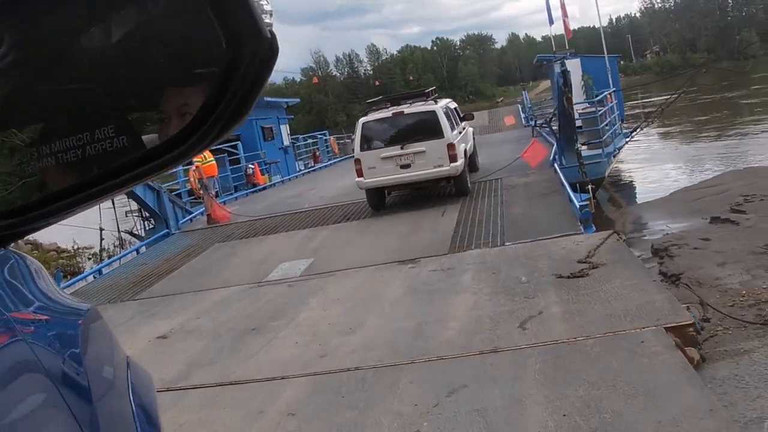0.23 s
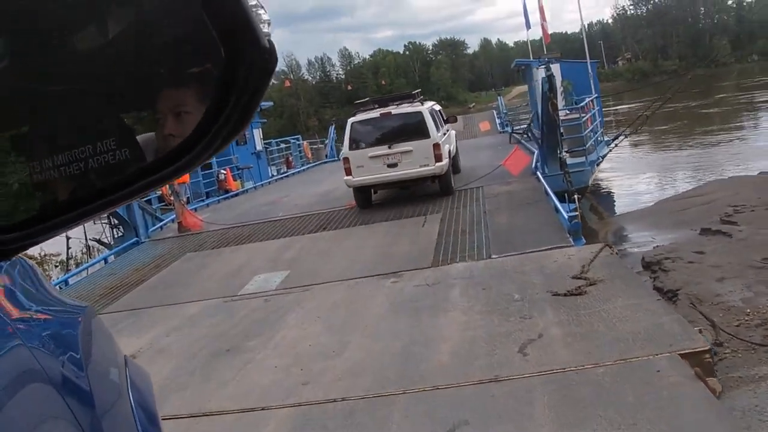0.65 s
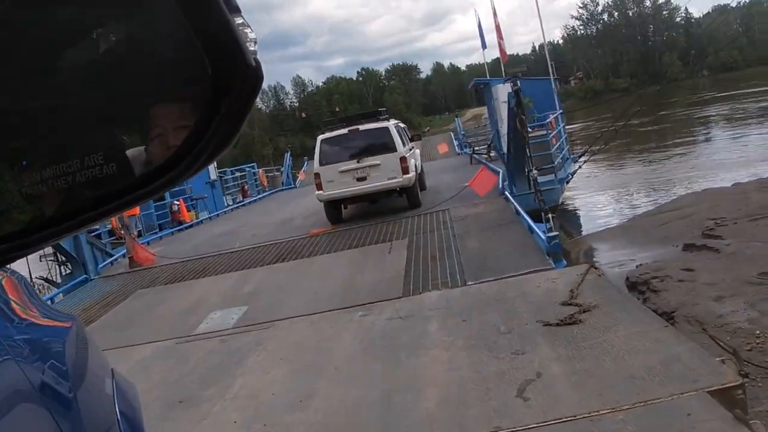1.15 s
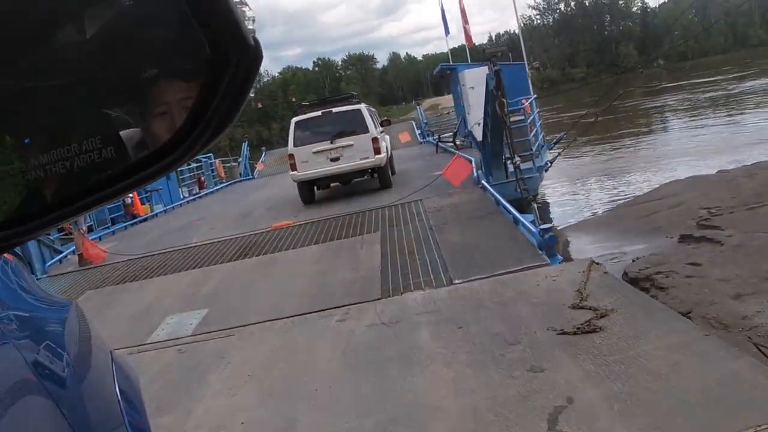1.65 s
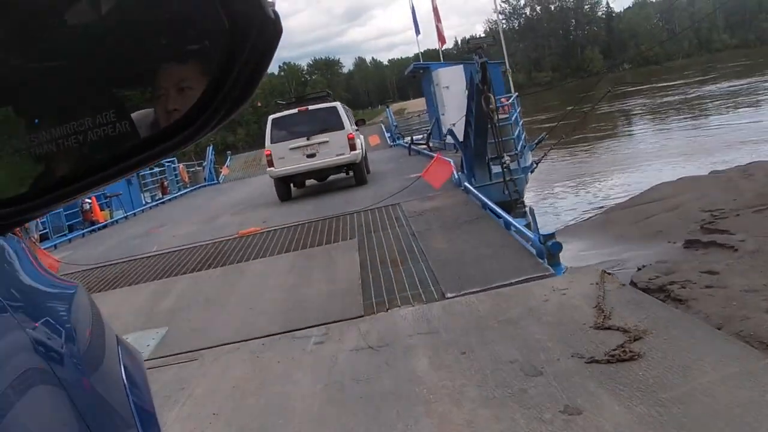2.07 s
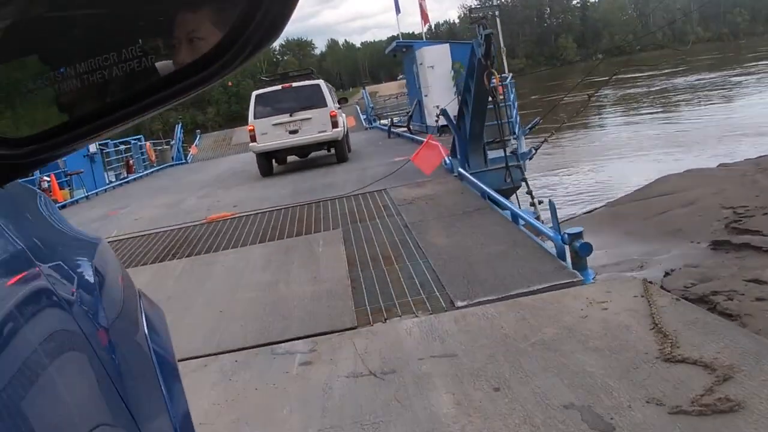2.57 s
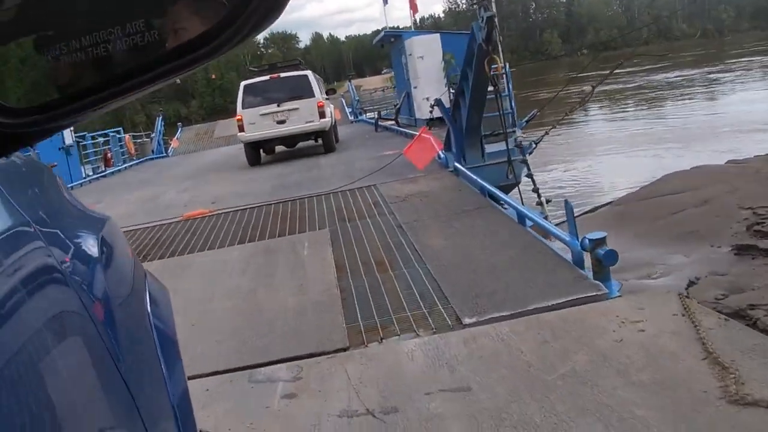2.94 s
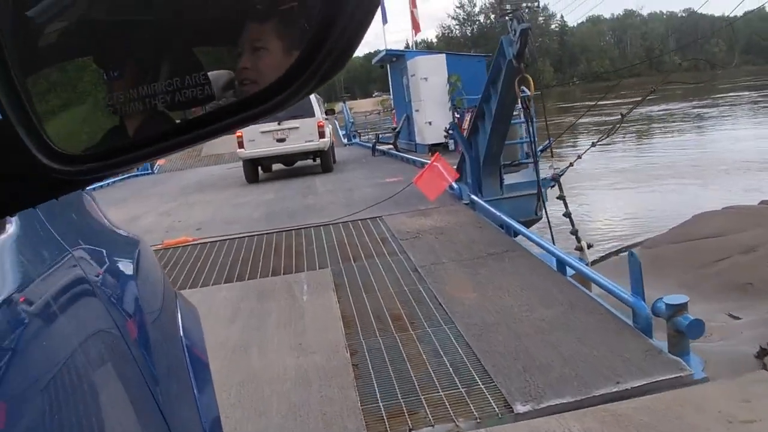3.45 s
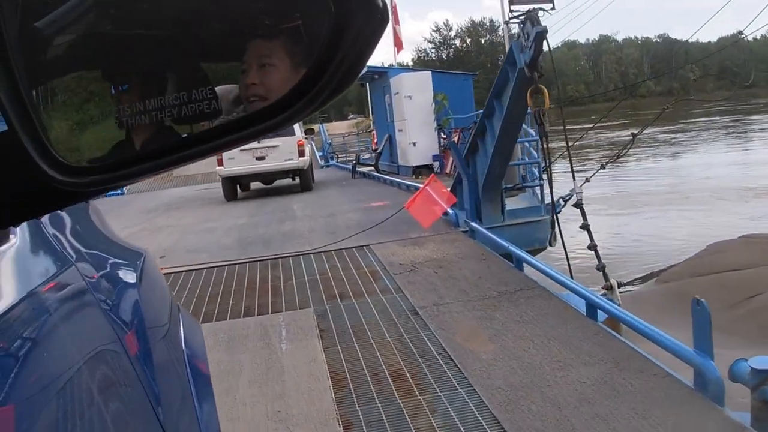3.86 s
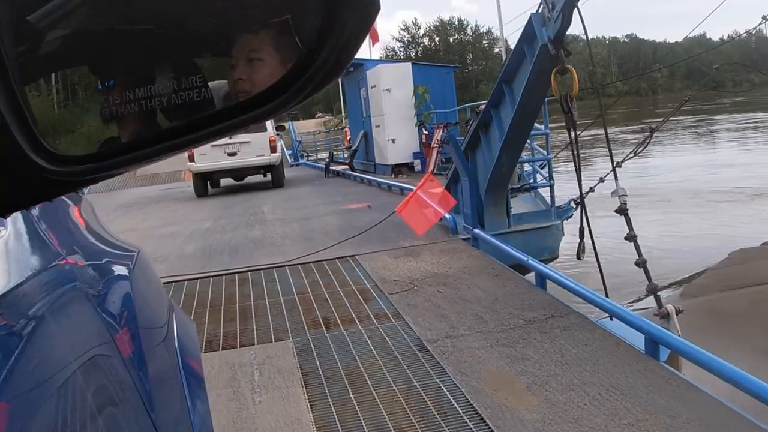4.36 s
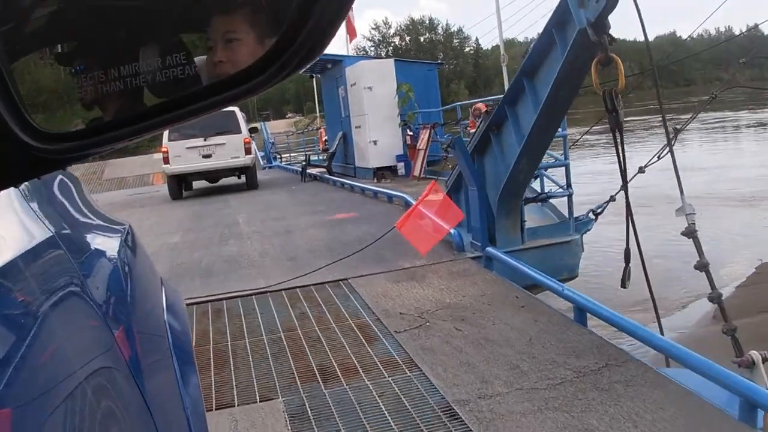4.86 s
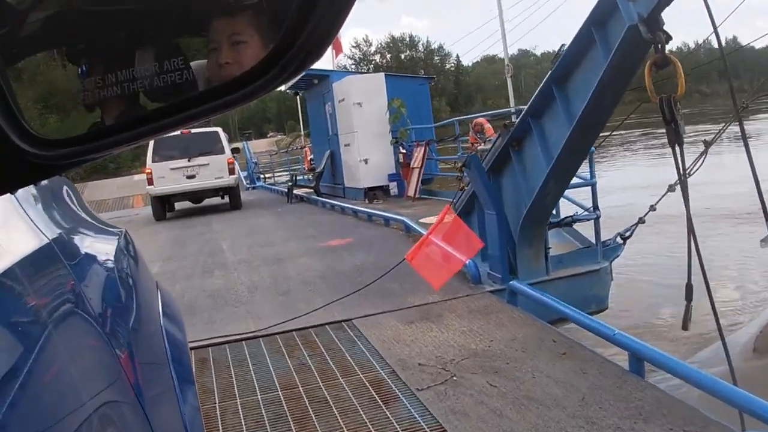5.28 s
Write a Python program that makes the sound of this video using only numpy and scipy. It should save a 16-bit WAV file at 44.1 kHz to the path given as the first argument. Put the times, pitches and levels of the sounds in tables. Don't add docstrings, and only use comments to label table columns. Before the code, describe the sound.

A car creeps down a ramp onto a river ferry, heard outdoors from its side window. A steady low diesel drone and muffled airy machinery noise run throughout, with deep soft buffets on the microphone. From about 0.6 s the car's own engine hums, sinking slightly in pitch and fading by 2.6; a car ahead pulls from 0.8 and eases away. Tyres rumble dully, with a small metal tick at 1.9. At 2.3 s a steel plate slams very loudly, bounces once and rings with a deep boom; the background ducks, then creeps back. Settling knocks and gritty rattles follow at 2.6 to 3.1, with a light tick at 3.3. A sharp knock at 4.05 leads into a second slam at 4.1, less loud, clattering through bounces until 4.4, with a shuddering rumble. A faint engine pull follows, a small knock at 4.7, then a bright gritty snap at 5.46.

```python
import sys
import numpy as np
from scipy import signal
from scipy.fft import rfft, irfft
from scipy.io import wavfile
from scipy.ndimage import uniform_filter1d

SR = 44100
rng = np.random.default_rng(int(sys.argv[2]) if len(sys.argv) > 2 else 0)


def attenuation_scalar(level_db):
    decades = np.asarray(level_db, float) / 20
    return 10 ** decades


def file_out(sig):
    cols = np.atleast_2d(sig).T
    lim = np.clip(cols, -1, 1)
    pcm = np.round(lim * 32767).astype(np.int16)
    wavfile.write(sys.argv[1], SR, pcm)


N = 243652

DIESEL_HZ = 39.07
# (multiple of firing rate [1], level [dB])
DIESEL_ORDERS = [(2, -33.5), (3, -43.5), (4, -41.5), (5, -42.5), (6, -49.5), (11, -60), (12, -54),
                 (30, -56.5)]
# (time [s], level [dB])
DIESEL_LOAD = [(0, -39), (.8, -33), (2.0, -46), (2.95, -27), (3.25, -34.5), (3.5, -31.5), (4.2, -29),
               (4.7, -50), (5.1, -27.5), (5.52, -29)]
# (time [s], firing rate [Hz], level [dB])
OWN_ENGINE = [(.6, 53.9, -36), (.85, 52.7, -27.5), (1.2, 51.58, -24), (1.6, 50.74, -24.5),
              (2.0, 48.07, -26.5), (2.3, 47.6, -29), (2.6, 49, -69)]
# (multiple of firing rate [1], level [dB])
OWN_ORDERS = [(1, -3.5), (2, -6.5), (4, -16)]
# (start [s], full effort [s], end [s], full firing rate [Hz], level [dB])
PULLS = [
    (0.753, 1.107, 3.4, 32.8, -30.5),
    (4.314, 4.567, 3.85, 29.0, -39.5),
]
# (multiple of firing rate [1], level [dB])
AHEAD_ORDERS = [(1, -36), (2, -20), (3, -8.5), (4, -3.5)]
IDLE_SHARE, EASE_DB, OFF_DB = 0.72, -17, -34

# (frequency [Hz], level per Hz [dB])
WASH_COLOUR = [(180, -28.5), (300, 1.5), (430, 0), (540, -4), (850, -3.5), (1060, -7), (1440, -7.5),
               (1880, -12), (2750, -14), (3740, -19.5), (5500, -25), (7100, -37.5), (8600, -33.5),
               (10000, -35)]
# (time [s], level [dB])
NEARNESS = [(0, -36.5), (.7, -38), (.9, -36), (1.3, -37.5), (2.2, -38), (2.8, -40), (3.5, -39.5),
            (3.9, -38), (4.6, -40.5), (5.2, -38), (5.52, -35.5)]
# (frequency [Hz], width [Hz], level [dB])
CASINGS = [(1118, 31, -56), (1475, 250, -48.5), (2676, 330, -52)]
# (frequency [Hz], level per Hz [dB])
LURCH_COLOUR = [(12, -10), (22, -12.5), (32, -15), (50, -17), (80, -19)]
# (time [s], level [dB])
LURCHES = [(.18, -56), (.85, -22.5), (1.6, -35), (2.25, -28.5), (2.75, -22), (3.37, -38.5), (3.65, -33),
           (4.03, -32.5), (4.5, -28), (4.73, -62), (5.25, -47)]
LURCH_S, CALM_DB = 0.068, -34
# (frequency [Hz], level per Hz [dB])
RUMBLE_COLOUR = [(32, -20), (55, -7), (106, -0.5), (195, -11), (274, -12), (383, -23), (452, -27),
                 (500, -28), (650, -29), (1100, -120)]
# (time [s], level [dB])
ROLLING_SPEED = [(0, -31), (.7, -29.5), (1.1, -30.5), (2.2, -31.5), (2.85, -32), (3.4, -31), (4.0, -29.5),
                 (4.9, -30.5), (5.52, -31.5)]
# (time [s], level [dB])
SHUDDERS = [
    (2.30, -20.5),
    (4.11, -20),
]
SHUDDER_RISE_S, SHUDDER_T60 = 0.24, 0.57

# (time [s], level [dB], centre [Hz], time to fade by 60 dB [s])
GRIT = [(0.848, -50, 6050, 0.11), (1.309, -50, 4970, .024), (1.936, -50, 8700, .12),
        (2.165, -51, 8560, 0.12), (2.616, -44, 7510, 0.12), (2.621, -41.5, 4400, 0.17),
        (2.714, -45, 8100, 0.014), (2.937, -48, 6400, .099), (3.052, -44, 10000, .07),
        (3.055, -55, 3600, .078), (3.446, -51.5, 7700, .1), (3.584, -52, 4950, 0.018),
        (3.886, -53, 8500, .12), (4.045, -47, 3800, .05), (4.188, -45, 4200, .03), (4.187, -45, 9200, 0.12),
        (4.327, -45, 7400, .15), (4.714, -51, 10600, .02), (4.743, -50.5, 8900, 0.13),
        (4.896, -47, 10700, 0.037), (5.333, -52, 8600, 0.18), (5.4572, -34.5, 8100, .21),
        (5.4574, -27.5, 3620, 0.0086), (5.4574, -39.5, 12000, 0.18), (5.465, -33, 8000, .05)]
CHIME_DB, CHIME_WIDTH_HZ, CHIME_RATIO = -14, 78, 1.1
# (time [s], peak level [dB], centre [Hz])
RATTLES = [(0.847, -27, 485), (1.861, -22, 1290), (2.165, -42, 650), (2.617, -28.5, 960),
           (2.622, -27, 1600), (2.714, -28.5, 1520), (2.936, -27.5, 910), (3.0526, -18, 990),
           (3.057, -32.5, 940), (3.273, -32, 1540), (4.0451, -16.5, 1910), (4.049, -22, 1290),
           (4.19, -19.5, 1336), (4.744, -29, 830), (5.4572, -26, 2820), (5.4581, -16.5, 950),
           (5.4655, -22.5, 1080)]
RATTLE_T60 = 0.074

# (time [s], peak [dB], centre [Hz], wave spread [ms], ring [dB])
FIRST_SLAM = [
    (2.2987, 2, 640, 3.52, -3),
    (2.376, -6, 374, 2.5, -11.5),
]
# (time [s], peak [dB], centre [Hz], wave spread [ms], ring [dB])
SECOND_SLAM = [
    (4.1102, -6, 555, 14.0, -9.5),
    (4.140, -11, 510, 2.93, -16),
    (4.2175, -15, 525, 16, -24),
    (4.248, -18, 450, 3.93, -25),
    (4.3140, -16, 570, 15, -19.5),
    (4.365, -26, 393, 12.3, -33),
]
# (time [s], peak [dB], centre [Hz], wave spread [ms], ring [dB])
SETTLING = [
    (2.621, -18, 470, 3.6, -13),
    (2.645, -25, 350, 6.45, -35),
    (2.938, -22.5, 423, 5.4, -24.5),
]
# (frequency [Hz], level per Hz [dB])
FIRST_RING = [(29, -28), (50, -3.5), (80, -15.5), (136, -6.5), (249, -12), (288, -12), (361, -7.5),
              (438, -13.5), (475, -12.5), (824, -18.5), (985, -21.5), (1360, -22.5), (2400, -43),
              (3120, -82), (5280, -120)]
# (frequency [Hz], level per Hz [dB])
SECOND_RING = [(29, -36), (50, -8), (102, -22), (132, -1.5), (163, -23), (222, -19.5), (431, -7.5),
               (657, -21.5), (824, -15), (1030, -26), (1430, -31.5), (1940, -45), (2400, -52), (3120, -74),
               (5280, -120)]
# (frequency [Hz], time to fade by 60 dB [s])
FIRST_DECAY = [(60, 1.46), (250, 0.84), (550, 0.6), (1000, 0.21), (1900, 0.27)]
# (frequency [Hz], time to fade by 60 dB [s])
SECOND_DECAY = [(60, 0.59), (250, 0.34), (700, 0.44), (1900, 0.3)]
# (frequency [Hz], time to fade by 60 dB [s])
SETTLING_DECAY = [(60, 0.72), (250, 0.22), (1900, 0.12)]
# (frequency [Hz], level against the ring [dB], time to fade by 60 dB [s])
FIRST_BOOM = [(32.4, -6.5, 1), (77.3, -1.5, 0.38), (90.3, -9, .8), (106.9, -6.5, 0.53), (260, -11.5, 0.48),
              (190.7, -14, 0.24), (302, -15.5, 0.55), (357, -2.5, 0.17)]
# (frequency [Hz], level against the ring [dB], time to fade by 60 dB [s])
SECOND_BOOM = [(39.4, -7, 0.7), (88.4, -4.5, 0.68), (111.2, -2.5, 0.59), (129.4, -5, .8),
               (196.5, -19, 0.36), (437, -19, 0.87)]

# (frequency [Hz], level [dB])
MICROPHONE = [(5, -20), (25, -1), (9900, -1), (11200, -10), (13800, -17), (14900, -27), (15200, -64)]
QUICK_DB_PER_S, QUICK_OVER_DB, QUICK_SHARE = 129, 7.5, 0.44


def evened(x):
    return x / np.sqrt(np.mean(x ** 2) + 1e-20)


def read(points, hz):
    f, value = np.transpose(points)
    return np.interp(np.log(hz + 1), np.log(f + 1), value, left=-90, right=-90)


def curves(rows):
    s, *columns = np.transpose(rows)
    return [np.interp(np.arange(N) / SR, s, c) for c in columns]


def add(mix, s, sound):
    part = mix[round(s * SR):][:len(sound)]
    part += sound[:len(part)]


def drift(low_hz, top_hz):
    t = np.arange(0, N + 200, 200) / SR
    rates = np.geomspace(low_hz, top_hz, num=20)
    slow = sum(np.sin(2 * np.pi * (f * t + rng.random())) / np.sqrt(f) for f in rates)
    return np.interp(np.arange(N) / SR, t, evened(slow))


def resonate(x, hz, width):
    turn = np.exp(2j * np.pi * hz * np.arange(len(x)) / SR)
    r = np.exp(-np.pi * width / SR)
    return 2 * (turn * signal.lfilter([1 - r], [1, -r], x / turn)).real


def noise(colour, size, patchy_db):
    hz = np.fft.rfftfreq(size, 1 / SR)
    a, b, patches = rng.standard_normal((N // (size // 4) + 5, len(hz), 3)).T
    patches = uniform_filter1d(patches, size=10, axis=0)
    patches = evened(uniform_filter1d(patches, size=8, axis=1))
    level_db = read(colour, np.minimum(hz, 10000))[:, None] + patchy_db * patches
    z = (a + 1j * b) * attenuation_scalar(level_db)
    return evened(signal.istft(z, nperseg=size, noverlap=size * 3 // 4)[1][:N])


def orders(hz, table, waver_db):
    turns = np.cumsum(hz) / SR
    out = np.zeros(N)
    for k, db in table:
        level = np.sqrt(2) * attenuation_scalar(db + waver_db * drift(1.6, 13))
        out += level * np.sin(2 * np.pi * (k * turns + rng.random()))
    return out


def ferry_diesel():
    firing = DIESEL_HZ * (1 + 0.00411 * drift(.3, 1.8))
    steady = orders(firing, DIESEL_ORDERS, waver_db=1.5)
    lowest = orders(firing, [(0.95, 0.01)], waver_db=3.0)
    return steady + attenuation_scalar(curves(DIESEL_LOAD)[0]) * lowest


def machinery_wash():
    casings = np.zeros(N)
    for hz, width, db in CASINGS:
        casings += attenuation_scalar(db + 41) * evened(resonate(rng.standard_normal(N), hz, width))
    level = attenuation_scalar(curves(NEARNESS)[0] + 0.8 * drift(5, 35))
    return level * (noise(WASH_COLOUR, size=512, patchy_db=1.2) + casings)


def lurches():
    t = np.arange(N) / SR
    level = attenuation_scalar(CALM_DB) + sum(attenuation_scalar(db) * np.exp(-((t - s) / LURCH_S) ** 2) for s, db in LURCHES)
    return level * noise(LURCH_COLOUR, size=4096, patchy_db=3.0)


def pulls():
    rows = []
    for start, full, end, hz, db in PULLS:
        rows += [(start - .05, IDLE_SHARE * hz, db - 60),
                 (start, IDLE_SHARE * hz, db + OFF_DB),
                 (full, hz, db),
                 (end, hz, db + EASE_DB),
                 (end + .1, hz, db - 60)]
    return rows


def car_engine(rows, table):
    hz, db = curves(rows)
    wavering_hz = hz * (1 + 0.0088 * drift(1.3, 11.0))
    return attenuation_scalar(db) * orders(wavering_hz, table, waver_db=1.5)


def tyre_rumble():
    t = np.arange(N) / SR
    level = attenuation_scalar(curves(ROLLING_SPEED)[0])
    for s, db in SHUDDERS:
        rise = np.clip((t - s) / SHUDDER_RISE_S, 0, 1)
        fade_s = np.maximum(t - s - SHUDDER_RISE_S, 0)
        level += rise * attenuation_scalar(db - 60 * fade_s / SHUDDER_T60)
    return level * noise(RUMBLE_COLOUR, size=4096, patchy_db=3.5)


def grit():
    out, t = np.zeros(N), np.arange(6000) / SR
    for s, db, hz, t60 in GRIT:
        fading = attenuation_scalar(-60 * t / max(t60, .004)) + .2 * attenuation_scalar(-60 * t / 0.0091)
        burst = rng.standard_normal(6000) * fading
        fizz = resonate(resonate(burst, hz, 3200), hz, 4200) + resonate(burst, 5700, 3500)
        chime = resonate(burst, hz, CHIME_WIDTH_HZ) + resonate(burst, hz * CHIME_RATIO, CHIME_WIDTH_HZ)
        fizz = evened(fizz) + attenuation_scalar(CHIME_DB) * evened(chime)
        add(out, s, attenuation_scalar(db) * fizz / np.std(fizz[:200]))
    return out


def arrival(f, hz, spread_ms):
    return spread_ms / 1000 * (np.sqrt(hz / f) - .65)


def bending_wave(hz, spread_ms, width=0.53):
    f = np.fft.rfftfreq(4096, 1 / SR) + 1
    shape = np.exp(-(np.log(f / hz) / width) ** 2)
    delay_s = arrival(f, hz, spread_ms) + 200 / SR
    wave = -irfft(shape * np.exp(-2j * np.pi * np.cumsum(delay_s) * SR / 4096))
    return wave / abs(wave).max()


def rattles():
    out, t = np.zeros(N), np.arange(4000) / SR
    for s, db, hz in RATTLES:
        burst = rng.standard_normal(4000) * attenuation_scalar(-60 * t / RATTLE_T60)
        rattle = resonate(resonate(burst, hz, 460), hz, 1100)
        add(out, s, attenuation_scalar(db - 18) * rattle / np.std(rattle[:300]))
        add(out, s - 200 / SR, attenuation_scalar(db) * bending_wave(hz, spread_ms=2.303, width=0.39))
    return out


def ramp_plate(blows, colour, decay, boom):
    out = np.zeros(N)
    t = np.arange(SR // 13)[:, None] * 8 / SR
    hz = np.linspace(45, 2400, num=400) + rng.uniform(-3, 3, size=400)
    decay_hz, decay_t60 = np.transpose(decay)
    t60 = np.interp(np.log(hz), np.log(decay_hz), decay_t60)
    size = attenuation_scalar(read(colour, hz))
    dying = (attenuation_scalar(-60 * t / t60) * np.exp(2j * np.pi * hz * t)).astype(np.complex64)

    boom_hz, boom_db, boom_t60 = np.transpose(boom)
    deep_tones = attenuation_scalar(-60 * t / boom_t60) * np.sin(2 * np.pi * boom_hz * t)
    deep = deep_tones @ attenuation_scalar(boom_db)
    deep = signal.resample_poly(deep, up=8, down=1)

    for s, db, centre_hz, spread_ms, ring_db in blows:
        phase = rng.uniform(0, 2 * np.pi, len(hz))
        late = np.maximum(t - arrival(hz, centre_hz, spread_ms) - .0015, 0)
        building = 1 - np.exp(-late * hz / 2.0)
        ring = ((dying * building) @ (size * np.exp(1j * phase))).imag
        ring = signal.resample_poly(ring / np.linalg.norm(size), up=8, down=1)
        add(out, s, attenuation_scalar(ring_db) * ring)
        add(out, s + spread_ms / 1000 * 0.556, attenuation_scalar(ring_db) * deep)
        add(out, s - 200 / SR, attenuation_scalar(db) * bending_wave(centre_hz, spread_ms))
    return out


def scene():
    background = ferry_diesel() + machinery_wash() + lurches()
    cars = car_engine(pulls(), AHEAD_ORDERS) + car_engine(OWN_ENGINE, OWN_ORDERS) + tyre_rumble()
    small_sounds = grit() + rattles()
    settling_boom = [(57.2, 5, 0.26), (239.4, -2.5, 0.23)]
    settling = ramp_plate(SETTLING, FIRST_RING, SETTLING_DECAY, settling_boom)
    slams = ramp_plate(FIRST_SLAM, FIRST_RING, FIRST_DECAY, FIRST_BOOM)
    slams += ramp_plate(SECOND_SLAM, SECOND_RING, SECOND_DECAY, SECOND_BOOM)
    return (background + cars + small_sounds + settling + slams)[None]


def held(power_db, db_per_s):
    fall = np.arange(N) * db_per_s / SR
    return np.maximum.accumulate(power_db + fall) - fall


def low_pass(x):
    return signal.sosfilt(signal.butter(12, 14930, fs=SR, output="sos"), x)


def record(dry):
    response = attenuation_scalar(read(MICROPHONE, np.fft.rfftfreq(N, 1 / SR)))
    heard = irfft(rfft(dry) * response, N)
    power_db = 10 * np.log10(abs(uniform_filter1d(heard[0] ** 2, size=200)) + 1e-12)
    slow_over_db = np.maximum(held(power_db, db_per_s=10.5) + 15.5, 0)
    quick_over_db = np.maximum(held(power_db, QUICK_DB_PER_S) + QUICK_OVER_DB, 0)
    over_db = slow_over_db + QUICK_SHARE * quick_over_db
    ducked = heard / attenuation_scalar(0.38 * uniform_filter1d(over_db, size=120, origin=40))
    return low_pass(ducked)


dry = scene()
out = record(dry)
file_out(out)
```